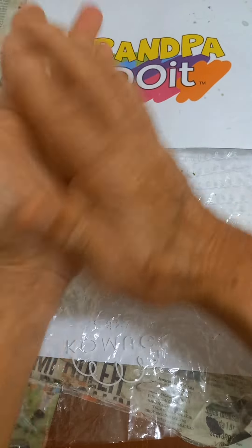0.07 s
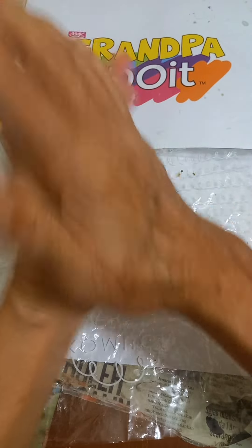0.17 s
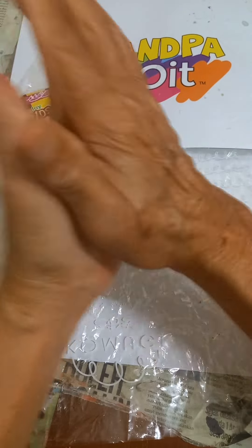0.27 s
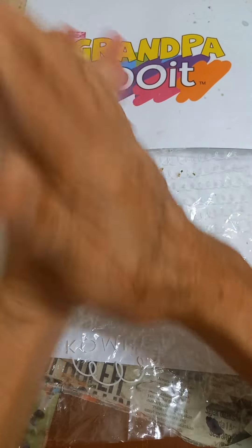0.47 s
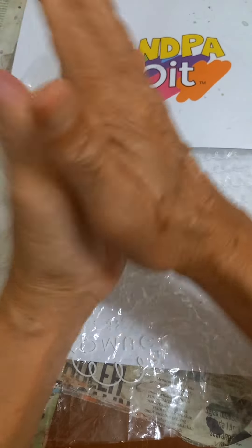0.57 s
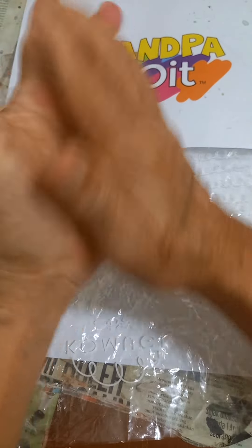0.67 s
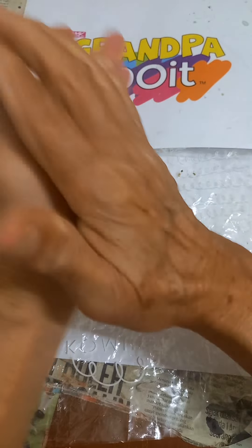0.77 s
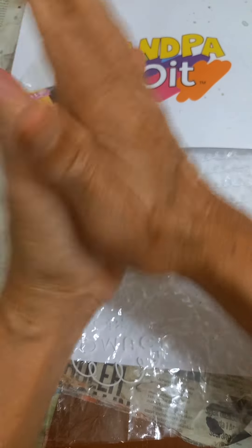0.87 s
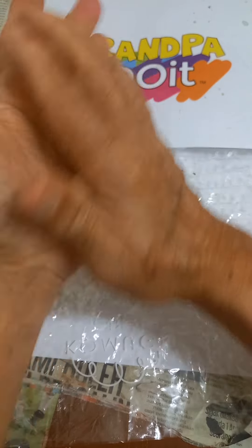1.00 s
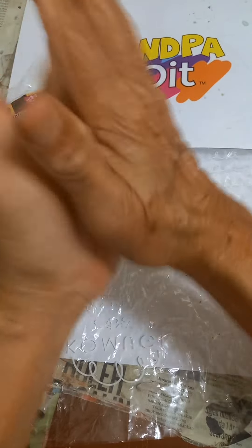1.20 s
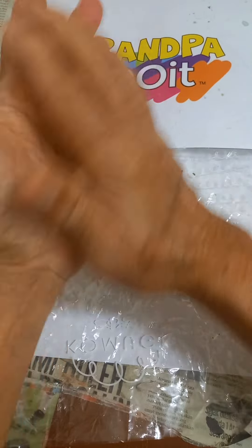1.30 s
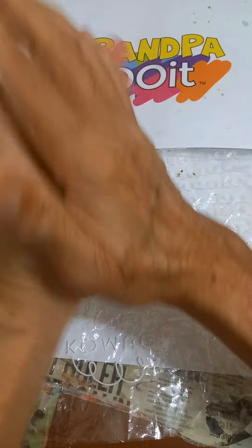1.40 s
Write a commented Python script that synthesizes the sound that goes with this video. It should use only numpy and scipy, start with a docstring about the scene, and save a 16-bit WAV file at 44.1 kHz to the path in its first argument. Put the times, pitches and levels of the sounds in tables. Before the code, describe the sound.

Two dry palms rub together close to the microphone with a soft, high swish, clearest from 0.2 to 0.5 seconds. Four strokes fan air onto the right side, making louder low rumbles with short bumps at about 0.3, 0.6, 0.9 and 1.2 seconds, the first strongest. The rubbing and rumble fade by about 1.4 seconds, with faint room air underneath throughout.

```python
"""A quiet room, two dry palms rubbing together just in front of a phone's stereo microphone.
Tiny slips of the skin make a soft swish and ring the hollow between the hands.
Each of four strokes fans air over the right port, where it rumbles and its strongest
eddies bump. The left port is sheltered. Faint room air lies underneath."""
import sys
import numpy as np
from scipy import signal
from scipy.fft import rfft, irfft
from scipy.io import wavfile
from scipy.ndimage import uniform_filter1d

SR = 44100
rng = np.random.default_rng(int(sys.argv[2]) if len(sys.argv) > 2 else 0)


def dump_mix(stems):
    """Bounce the given channels to the path in sys.argv[1] as a 16-bit WAV at rate SR."""
    frames = np.atleast_2d(stems).T  # one column per channel
    limited = np.clip(frames, -1, 1)  # hard clip at full scale
    pcm = np.round(limited * 32767).astype(np.int16)
    wavfile.write(sys.argv[1], SR, pcm)


N = 63945
T = np.arange(N) / SR
FREQS = np.fft.rfftfreq(N, 1 / SR)


def undb(db):
    """Decibels to gain."""
    return 10 ** (np.asarray(db) / 20)


def unit(x):
    """Scale to rms 1."""
    return x / np.sqrt(np.mean(x ** 2))


def curve(rows):
    """Gain over time for each dB column of a table."""
    times, *columns = np.array(rows).T
    return [undb(np.interp(T, times, db)) for db in columns]


def colour(x, spectrum):
    """Filter by (Hz, dB) points, to rms 1."""
    hz, db = np.array(spectrum).T
    gain = undb(np.interp(np.log(FREQS + 1), np.log(hz), db))
    return unit(irfft(rfft(x) * gain, N))


def resonate(x, hz, width_hz):
    """One resonance with gain 1 at its centre."""
    return signal.lfilter(*signal.iirpeak(hz, hz / width_hz, fs=SR), x)


def swell(centre_s, half_s):
    """A smooth rise and fall."""
    return np.exp(-.5 * ((T - centre_s) / half_s) ** 2)


def room_air(level_db=-65.5, shared=0.1):
    """Faint steady air of the room, partly shared by both ports."""
    # room tone: frequency_hz, relative_db
    air_spectrum = [(20, -18.5), (65, 7.5), (130, -4), (300, -10), (600, -20), (1200, -26), (2250, -29.5),
                    (2900, -32.5), (3800, -33), (5500, -37.5), (8300, -43.5), (15500, -35)]
    common, *own = [colour(rng.standard_normal(N), air_spectrum) for _ in range(3)]
    return undb(level_db) * (np.sqrt(shared) * common + np.sqrt(1 - shared) * np.array(own))


def grains(per_s=9000, spread_db=1.5):
    """Tiny slips of skin ridges: dense clicks of uneven size."""
    slips = rng.random(N) < per_s / SR
    clicks = slips * rng.standard_normal(N)
    size_db = spread_db * np.minimum(rng.exponential(size=N), 4)
    return unit(clicks * undb(size_db))


def ringing_grains(hz, width_hz):
    """Skin grains through one steep resonance."""
    return unit(resonate(resonate(grains(), hz, width_hz), hz, width_hz))


def skin_hiss(gain_db):
    """Flat palms hiss as they slide over each other."""
    # swish of the sliding: time_s, relative_db
    sliding = [(0.0, -96), (0.028, -85), (0.144, -96.5), (0.218, -87), (0.242, -73.5), (0.318, -63.5),
               (0.37, -68.5), (0.394, -62.5), (0.48, -72), (0.512, -59), (0.528, -67), (0.592, -89.5),
               (0.686, -79), (0.75, -96.5), (0.864, -90.5), (0.9, -77.5), (0.928, -85.5), (1.106, -95.5),
               (1.276, -86.5), (1.408, -101), (1.45, -81.5)]
    # hiss of flat palms: frequency_hz, relative_db
    skin_spectrum = [(700, -25), (1500, -22.5), (2600, -25.5), (4500, -16), (6800, -9), (8300, -5),
                     (9800, -5), (11800, -1.5), (15500, -8)]
    slide, = curve(sliding)
    return undb(gain_db) * slide * colour(grains(), skin_spectrum)


def cupped_hollow(q=1.2):
    """Skin grains ring the hollow between the cupped palms."""
    # hollows: centre_s, half_length_s, level_db, resonance_hz
    hollows = [(.065, 0.028, -78, 2900), (.29, .07, -80, 1912), (.505, 0.021, -76, 1314),
               (.57, 0.062, -79.5, 1700), (0.843, 0.045, -89, 2190), (.98, 0.035, -80.5, 1506),
               (1.2, 0.034, -85.5, 2200)]
    return sum(undb(db) * swell(at, half) * ringing_grains(hz, hz / q) for at, half, db, hz in hollows)


def microphone_ring():
    """The microphone's thin, high ring near 8.3 kHz swells as the palms rub."""
    # swells of the ring: centre_s, half_length_s, level_db
    ring_swells = [(0.074, 0.028, -79), (.18, .05, -85.5), (.29, .035, -73), (0.644, 0.062, -82.5),
                   (.9, .015, -86), (.99, 0.033, -90.5), (1.19, 0.025, -85), (1.274, 0.032, -85.5)]
    ring_level = sum(undb(db) * swell(at, half) for at, half, db in ring_swells)
    return ring_level * ringing_grains(hz=8250, width_hz=1200)


def turbulence(spectrum, even_s):
    """Random pressure whose strength stays even over spans longer than even_s."""
    pressure = colour(rng.standard_normal(N), spectrum)
    span = int(even_s * SR)
    local_power = uniform_filter1d(uniform_filter1d(pressure ** 2, span), span)
    return pressure / np.sqrt(local_power)


def port(pressure, low_hz=77.8, q=0.97):
    """Steep bass roll-off of the microphone: every push becomes a short falling swing."""
    w = 2 * np.pi * low_hz
    b, a = signal.bilinear([1, 0, 0], [1, w / q, w * w], SR)
    return signal.lfilter(b, a, signal.lfilter(b, a, pressure))


def draught(drift_below_db=-42):
    """Fanned air rumbles and flutters on the port; as it slows, a deep drift takes over."""
    # air flow of the four strokes: time_s, rumble_relative_db, flutter_relative_db
    flow = [(0, -78, -81), (.06, -62.5, -90), (.145, -73.5, -76), (.18, -43.5, -58), (.22, -33, -42),
            (.272, -24.5, -24.5), (.315, -20.5, -36), (.375, -25, -37.5), (.41, -35, -44),
            (.475, -33, -54.5), (.515, -36.5, -40.5), (.542, -34.5, -45), (.58, -29.5, -30),
            (.615, -29, -44), (.66, -33, -53), (.74, -47, -71.5), (.805, -56.5, -72), (.85, -39.5, -39.5),
            (.88, -25.5, -41), (.905, -31.5, -46.5), (.96, -28.5, -52), (1.03, -39, -61),
            (1.07, -50.5, -83), (1.135, -41.5, -62.5), (1.17, -35, -50.5), (1.215, -27.5, -53),
            (1.27, -44.5, -59.5), (1.39, -64, -83), (1.45, -75, -106)]
    # large eddies of brisk air: frequency_hz, relative_db
    rumble_spectrum = [(20, -11.5), (35, -3.5), (60, 5.5), (105, -1), (150, -6), (220, -23.5), (400, -50.5),
                       (900, -88.5), (3000, -120)]
    # slow air, with only the largest eddies: frequency_hz, relative_db
    drift_spectrum = [(20, -2.5), (40, 7), (65, 5.5), (90, -11.5), (130, -22), (250, -42), (900, -83.5),
                      (3000, -120)]
    # small eddies of brisk air: frequency_hz, relative_db
    flutter_spectrum = [(70, -21.5), (140, -8), (215, 5.5), (300, -10.5), (400, -21), (490, -29),
                        (700, -46), (1200, -72), (3000, -110)]
    deep, fine = curve(flow)
    brisk_share = deep ** 2 / (deep ** 2 + undb(drift_below_db) ** 2)
    rumble = np.sqrt(brisk_share) * turbulence(rumble_spectrum, even_s=0.062)
    drift = np.sqrt(1 - brisk_share) * undb(9) * turbulence(drift_spectrum, even_s=0.04)
    flutter = turbulence(flutter_spectrum, even_s=0.024)
    return port(undb(2.5) * deep * (rumble + drift) + undb(4) * fine * flutter)


def eddy_bumps():
    """Each strong eddy is one smooth push of pressure on the port."""
    # eddies that hit the right port: centre_s, peak_db, half_width_ms
    eddies = [(0.165, -35, 3), (.220, -20, 1.8), (0.2352, -20, 2.65), (0.2551, -16.5, 1.15),
              (0.2601, -10, 1.14), (0.2795, -20.5, 2.1), (0.3381, -12.5, 1.37), (0.4342, -18, 1.22),
              (0.5197, -16.5, 1.19), (0.5485, -13, 1.17), (0.5914, -14, 1.36), (0.6279, -16.5, 1.7),
              (0.6904, -29.5, 1.7), (0.824, -32, 5.4), (.848, -22, 0.94), (0.8552, -18.5, 2.14),
              (.9124, -14, 1.12), (.9705, -25.5, 2.66), (1.207, -30, 1.4), (1.2464, -24.5, 4.4)]
    bumps = np.zeros(N)
    for at, db, half_ms in eddies:
        swing = port(swell(at, half_ms / 1000))
        bumps += undb(db) * swing / np.abs(swing).max()
    return bumps


def heel_brushes(left):
    """The swish fills out where the heels of the hands pass each other."""
    # passes: centre_s, half_length_s, right_level_db, left_minus_right_db
    passes = [(0.401, 0.014, -64, -3), (0.444, 0.018, -67, -3), (0.505, 0.016, -61.5, -7)]
    # brushing heels: frequency_hz, relative_db
    brush_spectrum = [(600, -11), (1300, -4), (2500, -19), (3500, -5), (4800, -7.5), (5750, 3.5),
                      (7200, -4.5), (9000, -1), (15000, -14)]
    contact = sum(undb(db + left * pan) * swell(at, half) for at, half, db, pan in passes)
    return contact * colour(grains(), brush_spectrum)


def palms(left):
    """The rubbing as one port hears it; the hiss is louder on the right."""
    hiss = skin_hiss(gain_db=0 if left else 5.5)
    return hiss + heel_brushes(left) + cupped_hollow() + microphone_ring()


def scene(shelter_db=-46.5):
    """Close hands over room air, their wind almost wholly on the right port."""
    exposure = np.array([[undb(shelter_db)], [1]])
    wind = exposure * (draught() + eddy_bumps())
    hands = np.array([palms(left=True), palms(left=False)])
    return wind + hands + room_air()


def record(dry):
    """The microphone ports ring in the treble; the top is cut above 15.8 kHz."""
    ring = undb(-2) * resonate(dry, hz=8480, width_hz=730)
    top_cut = signal.ellip(10, .2, 80, 15800, fs=SR, output="sos")
    return signal.sosfilt(top_cut, dry + ring)


dry = scene()
out = record(dry)
dump_mix(out)
```